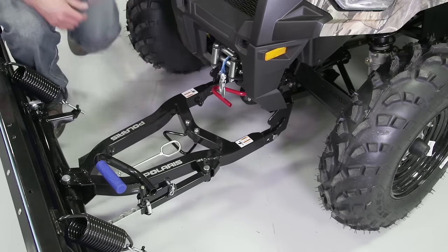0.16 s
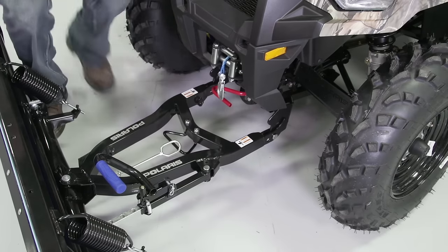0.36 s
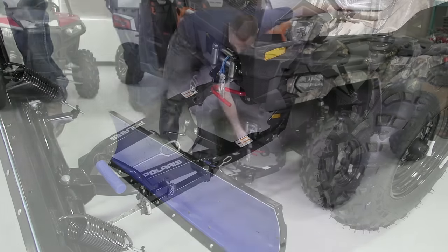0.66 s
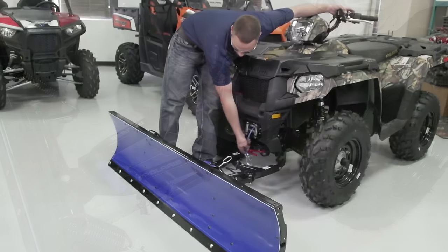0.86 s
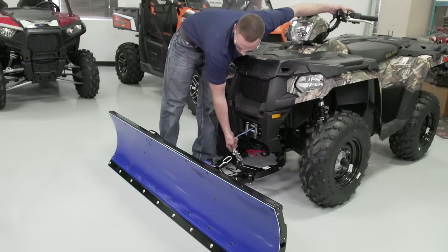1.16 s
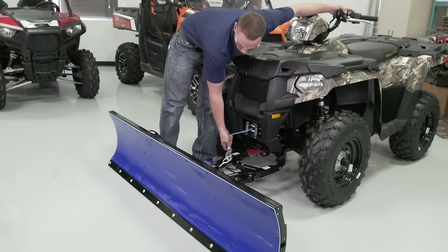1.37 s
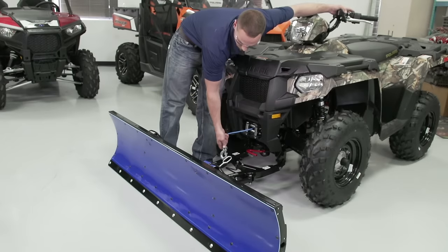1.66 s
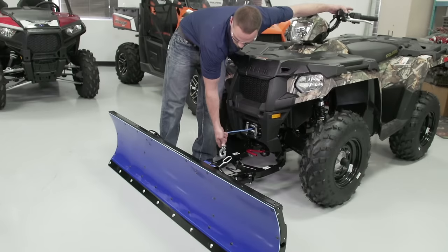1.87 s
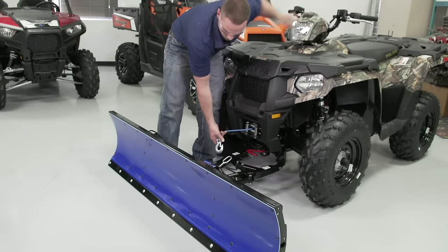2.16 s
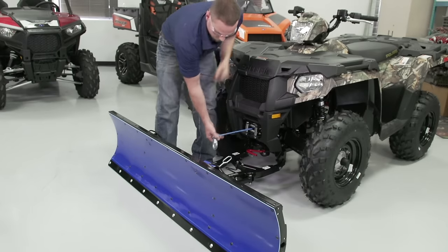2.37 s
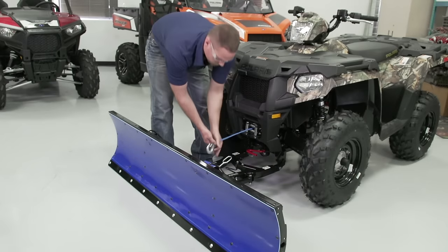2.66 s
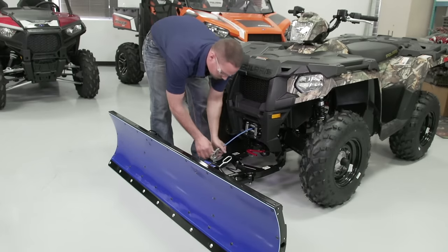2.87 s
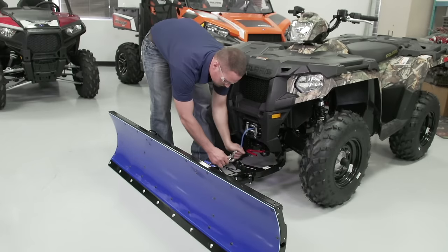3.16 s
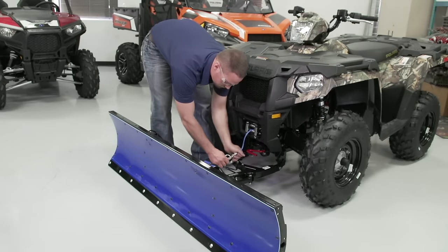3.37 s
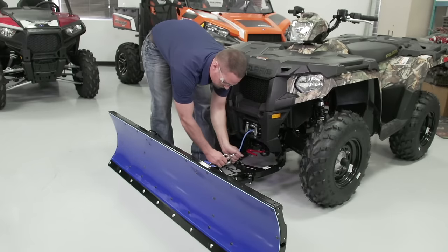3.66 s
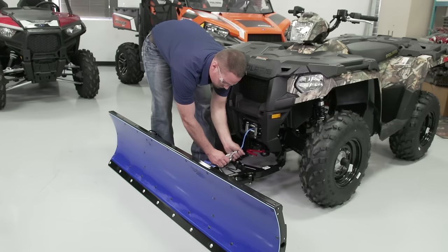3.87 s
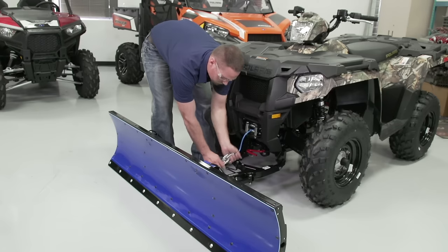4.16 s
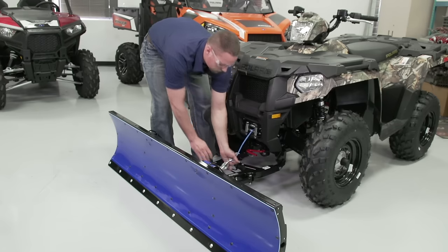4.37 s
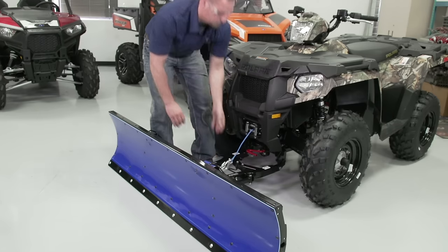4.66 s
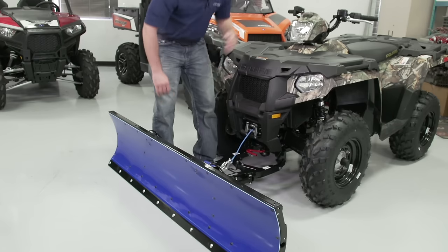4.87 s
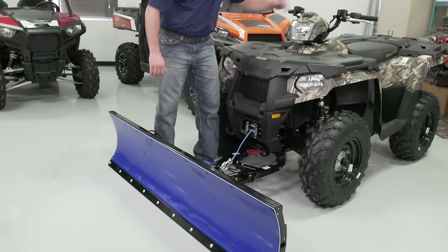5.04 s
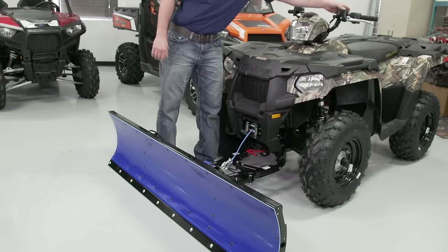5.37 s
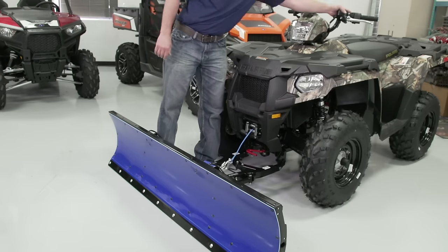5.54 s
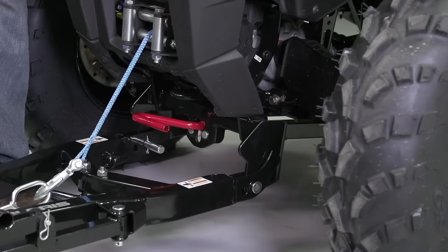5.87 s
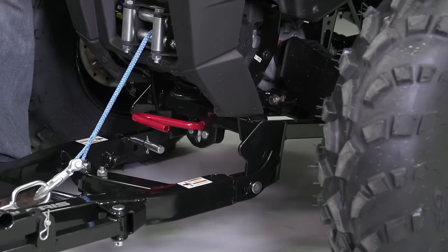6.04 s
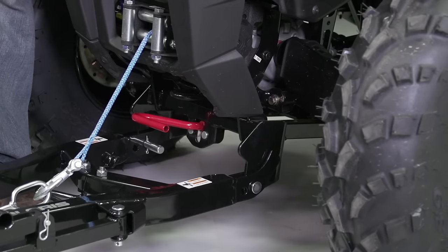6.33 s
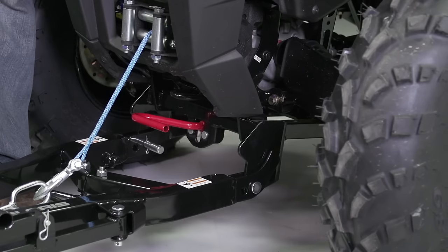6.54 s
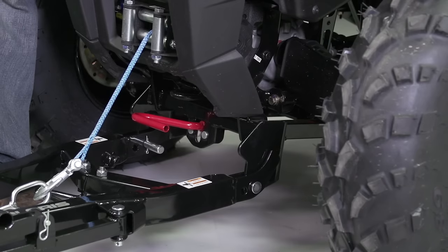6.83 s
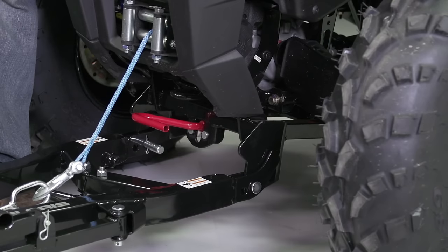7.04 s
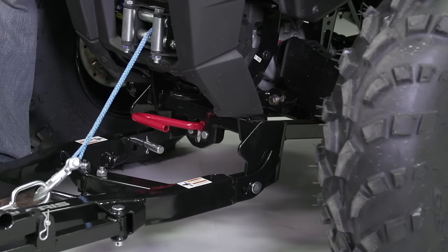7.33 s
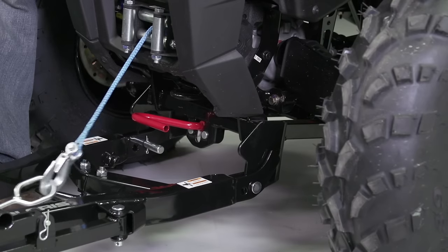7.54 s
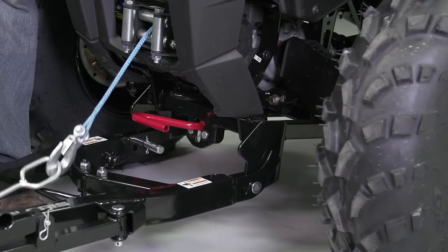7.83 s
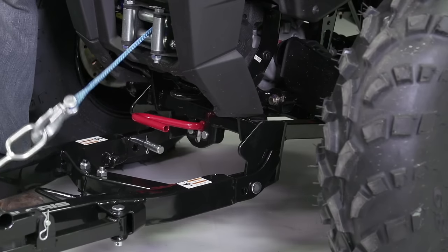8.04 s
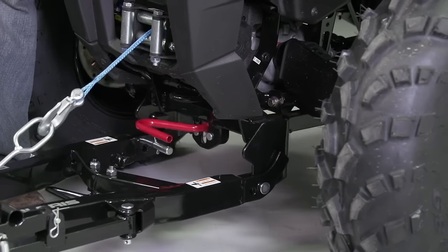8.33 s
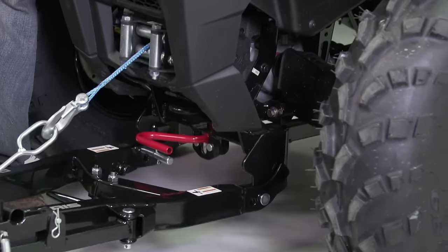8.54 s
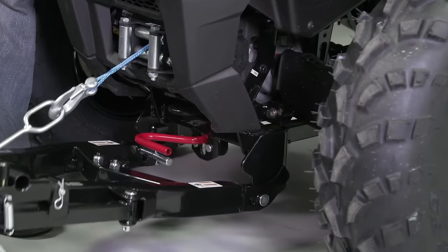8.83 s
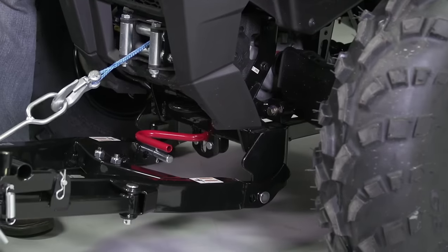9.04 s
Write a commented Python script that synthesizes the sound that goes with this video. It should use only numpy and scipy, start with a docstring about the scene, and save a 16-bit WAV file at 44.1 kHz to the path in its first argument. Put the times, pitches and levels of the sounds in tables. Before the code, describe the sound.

In a large room, a gritty winch motor runs twice, with a metal hook clinking between runs and heavy clanks near the end.

```python
"""A gritty electric whir fills a large, hard-floored showroom: a quad bike's winch pays out its rope.
Gear teeth grind in their housing, the slack rope jerks in its rollers, and relay and brake clack.
Amid soft footfalls and rustling clothes, a steel hook rattles onto a snow plough's lifting eye.
The winch reels in, the hook slides tight, and the plough comes off the floor with a clank,
its blade booming as the taut rope feeds it the vibration of the gears."""
import sys
import numpy as np
from scipy import signal
from scipy.io import wavfile

SR = 44100
rng = np.random.default_rng(int(sys.argv[2]) if len(sys.argv) > 2 else 0)


def unload_wav(signal):
    """Save mono or channel-first audio to the path in sys.argv[1] as 16-bit WAV at rate SR, clipped to [-1, 1]."""
    wavfile.write(
        sys.argv[1],
        SR,
        np.round(np.clip(np.atleast_2d(signal).T, -1, 1) * 32767).astype(np.int16),
    )


N = 405719


def amp(db):
    """Decibels to gain."""
    return 10 ** (np.asarray(db) / 20)


def unit(x):
    """Scales to rms 1."""
    return x / np.sqrt(np.mean(x ** 2) + 1e-20)


def curve(points, hz):
    """Reads (Hz, value) points on a log-frequency axis."""
    f, value = np.transpose(points)
    return np.interp(np.log(hz + 1), np.log(f + 1), value)


def add(mix, start_s, sound):
    """Mixes a sound in at its start time."""
    part = mix[max(round(start_s * SR), 0):][:len(sound)]
    part += sound[:len(part)]


def blend(parts):
    """Layers (sound, dB) pairs, each scaled to the energy that its dB gives."""
    out = np.zeros(2 * SR)
    for part, db in parts:
        add(out, 0, amp(db) * part / np.linalg.norm(part))
    return out


def eq(x, db_at, size=4096):
    """Causal filter whose gain in dB is the function db_at(Hz)."""
    log_gain = np.log(amp(db_at(abs(np.fft.fftfreq(size, 1 / SR)))) + 1e-6)
    taps = np.fft.ifft(np.exp(np.conj(signal.hilbert(log_gain)))).real[:size // 2]
    return signal.oaconvolve(x, taps)[:len(x)]


def shape(x, points):
    """EQ drawn through (Hz, dB) points."""
    return eq(x, lambda f: curve(points, f))


def wander(n, rate_hz):
    """Smooth random drift, roughly between -1 and 1."""
    knots = rng.standard_normal(N // 20)
    return np.interp(np.arange(n) * rate_hz / SR, np.arange(len(knots)), knots)


def ring(modes, scatter_db):
    """One second of struck modes (Hz, dB, t60 s); each strike weights them differently."""
    t = np.arange(SR) / SR
    hz, db, t60 = np.transpose(modes)
    gains = amp(db + scatter_db * rng.standard_normal(len(hz)))
    out = np.zeros(SR)
    for f, gain, life, phase in zip(hz, gains, t60, rng.random(len(hz))):
        age = t[:int(life * SR)]
        out[:len(age)] += gain * np.exp(-np.log(1000) * age / life) * np.sin(2 * np.pi * (f * age + phase))
    return out


def excite(force, modes, scatter_db=3, detune_hz=18):
    """Modes (Hz, dB, t60 s) driven by a contact force, reweighted and detuned on every hit."""
    force = np.pad(force, (0, SR - len(force))) + 1e-12
    out = np.zeros(SR)
    for hz, db, t60 in modes:
        radius = np.exp(-np.log(1000) / (t60 * SR))
        angle = 2 * np.pi * (hz + detune_hz * rng.standard_normal()) / SR
        tone = signal.lfilter([1, 0, -1], [1, -2 * radius * np.cos(angle), radius ** 2], force)
        out += amp(db + scatter_db * rng.standard_normal()) * unit(tone)
    return out


# Room tone EQ. Each row: frequency in Hz, gain in dB.
AIR_EQ = [(30, -22), (55, 1), (160, -2.5), (1400, -23.5), (4000, -33), (15500, -36.5)]
def ventilation(db=-54.5):
    """A low, gently swelling bed of moving air."""
    air = unit(shape(rng.standard_normal(N + SR), AIR_EQ)[SR:])
    return air * amp(db + 0.5 * wander(N, 3.2))


# Someone moving about the hook. Each row: start in seconds, length in seconds, level in dB.
RUSTLES = [(0, 0.28, -54), (2.5, 0.33, -55), (2.75, 0.77, -64), (5.86, 0.28, -65.5), (6.2, 0.55, -64)]
def rustle(length, db):
    """Cloth rubs on cloth: a faint, uneven hiss that swells and fades."""
    n = int(length * SR)
    rub = rng.standard_normal(n) * amp(db + 2 * wander(n, 10.3))
    return shape(rub, [(3000, 0.5), (15000, -4.5)]) * np.sin(np.pi * np.arange(n) / n)


# Winch cues. Each holds: switch-on, switch-off and fade-in time in seconds, gear level in dB.
PAY_OUT = (0.225, 1.925, 0.64, -35.5)
REEL_IN = (6.985, 8.92, 0.02, -36.3)
# Gearbox EQ for each direction. Each row: frequency in Hz, gain in dB.
PAY_OUT_EQ = [(45, -9), (110, 5.5), (570, 2), (1120, -1.5), (1350, -7), (2800, -7), (4700, -4.5),
              (7200, -9), (11000, -16.5), (15500, -35)]
REEL_IN_EQ = [(45, -11), (100, -2), (420, 2), (1250, -7), (2650, -13.5), (4400, -5), (5700, -8), (7500, -7),
              (11000, -17), (15500, -30)]
# Motor hum and gear whine. Each row: pitch in Hz, level in dB.
PAY_OUT_TONES = [(63.5, -51), (1012, -58), (2982, -48.5), (3978, -48)]
REEL_IN_TONES = [(63.1, -54), (190.6, -50), (1012, -54.5)]
# Gearbox housing resonances. Each row: centre in Hz, width in Hz, boost in dB.
HOUSING_PEAKS = [(1017, 100, 7), (1810, 600, 6.5), (4384, 71, 8), (5065, 280, 8.5), (6306, 210, 11)]
def winch(cue, gear_eq, tones, tick_db, carrier_hz, mesh_hz, shaft_hz=63, coast_db_per_s=133):
    """Gear teeth grind in the housing and the planet carrier ticks. Returns start time and sound."""
    on, off, rise_s, db = cue
    t = np.arange(on, off + 40 / coast_db_per_s, 1 / SR)
    n = len(t)
    load = plough_load(t)
    speed = 1 - .035 * load + .005 * wander(n, 30)  # the weight drags the pitch down
    clock = np.cumsum(speed) / SR
    # every tooth lands with its own force, over a bed of sliding friction
    teeth = np.diff(np.floor(mesh_hz * clock), prepend=0) * rng.standard_normal(n)
    throb = 1 + .2 * np.cos(2 * np.pi * shaft_hz * clock)
    grind = unit((.5 * unit(teeth) + rng.standard_normal(n)) * throb)
    housing = lambda f: sum(boost / (1 + (2 * (f - hz) / width) ** 2) for hz, width, boost in HOUSING_PEAKS)
    gears = unit(eq(grind, lambda f: curve(gear_eq, f) + housing(f)))
    ticks = carrier_ticks(carrier_hz * clock)
    whine = sum(whine_tone(clock, hz, tone_db) for hz, tone_db in tones)
    # extra growl at spin-up, and again as the weight comes on
    surge_db = 16 * np.exp((on - t) / .06)
    strain_db = 11.5 * load * np.exp(-np.maximum(t - LIFT_S, 0) / .44)
    growl = (amp(surge_db + strain_db) - 1) * shape(gears, [(100, -4), (500, 0), (3000, 0), (6000, -14)])
    body = amp(db) * (gears + growl + amp(tick_db) * ticks) + whine
    loaded = amp(2.5 * load) * body + load * blade_boom(grind)
    coast_db = -coast_db_per_s * (1 + .4 * load) * np.maximum(t - off, 0)  # load shortens the run-down
    envelope = np.minimum((t - on) / rise_s, 1) * amp(coast_db)
    return on, envelope * loaded * signal.windows.tukey(n, .02)


def carrier_ticks(turns, accent_db=3):
    """The carrier's slack closes once a turn with a bright rasp, accented every third turn."""
    n, count = len(turns), turns.astype(int)
    force = amp(5 * rng.uniform(-1, 1, n)[count] + accent_db * (count % 3 == 0))
    phase = (turns + .3 * wander(n, 25)) % 1
    bursts = unit(force * phase * np.exp(-phase / .15) * rng.standard_normal(n))
    return unit(shape(bursts, [(3000, -19.5), (7000, 5), (10000, -6), (15000, -18)]))


def whine_tone(clock, hz, db):
    """One motor or gear tone: low ones hum, high ones flutter into a whir."""
    n, flutter_hz = len(clock), .05 * hz
    tone = np.sin(2 * np.pi * hz * clock + .9 * wander(n, flutter_hz))
    return amp(db) * tone * (1 + .26 * wander(n, flutter_hz))


# The colour of steel on steel. Each row: frequency in Hz, gain in dB.
STEEL_EQ = [(45, -1.5), (300, 2.5), (1100, -3), (3000, -0.5), (5500, 2.5), (8000, 0), (11000, -7.5),
            (15500, -14.5)]
def clatter(length, db, treble_db, bodies, growth_db=0, decay_s=.013, clank_db=-4):
    """A burst of tiny steel contacts rings the brackets and the given (modes, dB) bodies."""
    t = np.arange(SR // 4) / SR
    swell = np.minimum(.61 + t / length, 1) * np.exp(-np.maximum(t - length, 0) / decay_s)
    swell *= np.minimum(t / min(length / 6, .01), 1)  # long scrapes get a softer attack
    swell *= amp(growth_db * np.minimum(t / length, 1))
    contacts = swell * rng.standard_normal(len(t))
    contacts *= amp(2 * np.minimum(rng.exponential(1, len(t)), 4) + 1.5 * wander(len(t), 160))  # grit
    bass_db = 4.5 - .083 * treble_db  # the harder the contact, the less bass
    tilt = [(400, bass_db), (1200, 0), (3300, .0079), (7500, treble_db)]
    crack = eq(contacts, lambda f: curve(STEEL_EQ, f) + curve(tilt, f))
    # many short modes, different at every contact point
    brackets = [(hz, 0, .04) for hz in 1200 + 14000 * rng.random(size=300) ** 1.3]
    clank = signal.fftconvolve(crack, ring(brackets, scatter_db=3))
    rings = [(excite(contacts, modes), ring_db) for modes, ring_db in bodies]
    return amp(db) * np.sqrt(length * SR) * blend([(crack, -2), (clank, clank_db)] + rings)


# The guide rollers' ring. Each row: pitch in Hz, level in dB, t60 in seconds.
ROLLER_MODES = [(371, -3.5, 0.44), (523, -4, 0.44), (708, 0, 0.3), (2020, -2.5, 0.032), (2460, -9, 0.031),
                (3570, -8, 0.02)]
# Rope jerks. Each row: start in seconds, length in seconds, level in dB.
ROPE_JERKS = [(1.048, 0.013, -23), (1.086, 0.015, -28.5), (1.176, 0.008, -24.5), (1.207, 0.0091, -28.5)]
def rope_jerk(length, db):
    """The slack rope jerks and rattles its guide rollers."""
    return clatter(length, db, treble_db=-6, bodies=[(ROLLER_MODES, 0)], decay_s=.014)


# The ring of relay and brake. Each row: pitch in Hz, level in dB, t60 in seconds.
RELAY_MODES = [(391, -3.5, 0.021), (936, 2, 0.015), (1665, -5, 0.12), (2210, -11, 0.037),
               (4930, -11, 0.035)]
# Switching clacks. Each row: start in seconds, length in seconds, level in dB, treble in dB.
RELAY_CLACKS = [(1.895, 0.0049, -23, 3), (1.905, 0.0066, -21.5, 0.5), (6.979, 0.0046, -29, 9),
                (6.988, 0.018, -25, 7), (8.922, 0.01, -33, 2)]
def relay_clack(length, db, treble_db):
    """The winch's relay and brake snap over with a short, hollow ring."""
    return clatter(length, db, treble_db, [(RELAY_MODES, -1)], decay_s=.01, clank_db=1.5)


# The plough blade's low ring. Each row: pitch in Hz, level in dB, t60 in seconds.
BLADE_MODES = [(62, -12, 0.2), (113, -1, 0.3), (166, 4, 0.4), (221, 1, 0.25), (301, -2, 0.2), (402, 0, 0.2)]
# Shoes, the stopping drum and the swinging plough.
# Each row: start in seconds, level in dB, high cut in Hz, blade ring in dB.
THUDS = [(1.902, -30, 323, -9), (2.36, -43, 227, -19), (3.96, -30, 173, -17), (4.785, -43.5, 109, -27),
         (5.586, -44.5, 220, -20.5), (6.215, -49.5, 300, -16), (6.712, -51.5, 784, -25),
         (9.022, -23, 386, -6.5), (9.065, -30, 352, -0.5)]
def thud(db, high_cut_hz, blade_db):
    """A soft, heavy contact that rings the blade; duller thuds last longer."""
    t = np.arange(SR // 4) / SR
    decay_s = 6 / high_cut_hz
    push = rng.standard_normal(len(t)) * np.exp(-t / decay_s)
    thump = shape(push, [(35, -20), (85, 0), (high_cut_hz, 0), (2 * high_cut_hz, -15), (6000, -55)])
    boom = ring(BLADE_MODES, scatter_db=.64) * np.minimum(np.arange(SR) / SR / .01, 1)
    return amp(db) * np.sqrt(decay_s * SR) * blend([(thump, 0), (boom, blade_db)])


# The bright ping of hook and eye. Each row: pitch in Hz, level in dB.
HOOK_MODES = [(4846, -5.5), (5365, -4.5), (5790, -6), (6110, -6), (7349, -5), (7447, -4), (7835, -7),
              (9421, -6), (11926, -7), (12672, -12), (13292, -12), (13924, -8), (14372, -1.5)]
def hook_modes(focus_hz, boost_db=11, octaves=.2, t60=.1):
    """The point of contact favours the hook's modes near one pitch."""
    return [(hz, db + boost_db / (1 + (np.log2(hz / focus_hz) / octaves) ** 2), t60)
            for hz, db in HOOK_MODES]


# The plough's tubular push frame. Each row: pitch in Hz, level in dB, t60 in seconds.
FRAME_MODES = [(182, -6, 0.45), (275, -1, 0.28), (374, -1.5, 0.2), (500, -4, 0.08), (718, -4, 0.26),
               (1760, -6, 0.11), (2770, -7, 0.13), (3875, -8, 0.07)]
# Hook hits. Each row: start in seconds, level in dB, treble in dB, frame ring in dB.
HOOK_KNOCKS = [(3.069, -52, -2.5, -16.5), (3.385, -21.5, 0.5, -11.5), (3.555, -29, -6.5, 1),
               (3.793, -31, 3.5, -4), (3.822, -31.5, -4, -9), (3.884, -26, -7, 0.5), (3.956, -16, 6, -12),
               (4.126, -29, -7, 3.5), (4.222, -21, -1.5, -3.5), (4.295, -22, 0.5, -8), (4.335, -24, -1, -8),
               (4.398, -25.5, 3, -10.5), (4.486, -21, 3, -20), (7.693, -24, 2.5, -5.5)]
def hook_knock(db, treble_db, frame_db):
    """The hook strikes the lifting eye and barely rings itself; harder hits chatter longer."""
    length = .016 * amp(db + 18.5)
    return clatter(length, db, treble_db, [(FRAME_MODES, frame_db), (hook_modes(focus_hz=7500), -19)])


# Hook slides. Each row: start and length in seconds, then level, growth, treble and hook ring in dB,
# favoured pitch in Hz, frame ring in dB.
HOOK_SCRAPES = [(3.42, 0.1, -40.5, -6, -4, -19.5, 7500, -3),
                (3.66, 0.078, -29.5, 11.5, -9, -22.5, 5000, -3.5),
                (3.915, 0.043, -31, 12, -2.5, -10, 8000, -8.5),
                (4.128, 0.079, -32, 8.5, 3, 0.5, 7500, -7.5), (4.217, 0.12, -27.5, 5.5, -3, 4, 8900, -4.5),
                (4.36, 0.055, -38, 4, 5, 9.5, 5370, -6), (7.614, 0.051, -25, -4, 3, -5.5, 7500, -11)]
def hook_scrape(length, db, growth_db, treble_db, hook_db, focus_hz, frame_db):
    """The hook slides on the eye and sings over the ring of the frame."""
    bodies = [(FRAME_MODES, frame_db), (hook_modes(focus_hz), hook_db)]
    return clatter(length, db, treble_db, bodies, growth_db)


# The ring of the plough's pivots. Each row: pitch in Hz, level in dB, t60 in seconds.
PIVOT_MODES = [(301, -5, 0.088), (406, 2.5, 0.12), (549, -5, 0.08), (1108, -5, 0.034), (3050, -5, 0.021)]
# Lift-off clanks. Each row: start and length in seconds, then level, treble and pivot ring in dB.
PIVOT_CLANKS = [(8.263, 0.0062, -25, -16, 3), (8.349, 0.024, -19, 0, -3), (8.399, 0.016, -24.5, -1.5, 3.5),
                (8.45, 0.07, -39, -16, 6)]
def pivot_clank(length, db, treble_db, ring_db):
    """The pivots jump in their play as the weight comes on."""
    return clatter(length, db, treble_db, [(PIVOT_MODES, ring_db)], decay_s=.021)


LIFT_S = 8.32
def plough_load(t, take_up_s=.035, settle_s=.35, held=.7):
    """Weight on the rope, 0 to 1: it comes on fast, overshoots and settles to the held share."""
    taken = .5 + .5 * np.tanh((t - LIFT_S) / (2 * take_up_s))
    return taken * (held + (1 - held) * np.exp(-np.maximum(t - LIFT_S, 0) / settle_s))


# What the taut rope passes on. Each row: frequency in Hz, gain in dB.
ROPE_EQ = [(113, 5.5), (166, -10.5), (400, -13)]
def blade_boom(grind):
    """Gear vibration travels down the rope and sets the plough blade humming."""
    hum = signal.fftconvolve(shape(grind, ROPE_EQ), ring(BLADE_MODES, scatter_db=.56))
    return amp(-33.5) * unit(hum[:len(grind)])


# Showroom reverb. Each row: frequency in Hz, t60 in seconds.
HALL_T60 = [(100, 1.3), (1300, 1.7), (4200, 1.35), (8500, 0.5)]
def hall(x, predelay_s=.013):
    """Sparse reflections of random sign; each band dies at its own speed."""
    slots = np.arange(0, SR, 20)
    arrivals = slots + rng.integers(0, 20, len(slots))
    taps = np.zeros(SR + 20)
    taps[arrivals] = rng.choice([-1., 1.], len(slots)) * (arrivals > predelay_s * SR)
    hz, t, bands = signal.stft(taps, SR, nperseg=256)
    decay = np.exp(-np.log(1000) * t / curve(HALL_T60, hz)[:, None])
    tail = signal.istft(bands * decay, SR, nperseg=256)[1]
    tail = shape(tail / np.linalg.norm(tail), [(100, -8), (240, -1), (2000, -7), (7000, -5)])
    return signal.fftconvolve(x, tail)[:N]


def scene():
    """A mono mix over room tone: the winch wet with reverb, the foley drier."""
    motor, foley = np.zeros(N), np.zeros(N)
    add(motor, *winch(PAY_OUT, PAY_OUT_EQ, PAY_OUT_TONES, tick_db=-5.5, carrier_hz=36.46, mesh_hz=1002))
    add(motor, *winch(REEL_IN, REEL_IN_EQ, REEL_IN_TONES, tick_db=-7, carrier_hz=36.45, mesh_hz=1008.4))
    tracks = [(HOOK_KNOCKS, hook_knock), (HOOK_SCRAPES, hook_scrape), (RELAY_CLACKS, relay_clack),
              (ROPE_JERKS, rope_jerk), (PIVOT_CLANKS, pivot_clank), (THUDS, thud), (RUSTLES, rustle)]
    for cues, source in tracks:
        for start_s, *settings in cues:
            add(foley, start_s, source(*settings))
    mono = motor + foley + hall(amp(-2.5) * motor + amp(-10) * foley) + ventilation()
    return np.array([mono, mono])


def record(dry, low_cut_hz=42, ceiling=.42, high_cut_hz=15850):
    """Microphone low cut, softly rounded peaks, then a steep high cut."""
    cut = signal.sosfilt(signal.butter(4, low_cut_hz, "high", fs=SR, output="sos"), dry)
    rounded = cut / (1 + (cut / ceiling) ** 4) ** .25
    lowpass = signal.firwin(511, high_cut_hz, window=("kaiser", 9), fs=SR)
    return signal.oaconvolve(rounded, lowpass[None], "same")


dry = scene()
out = record(dry)
unload_wav(out)
```